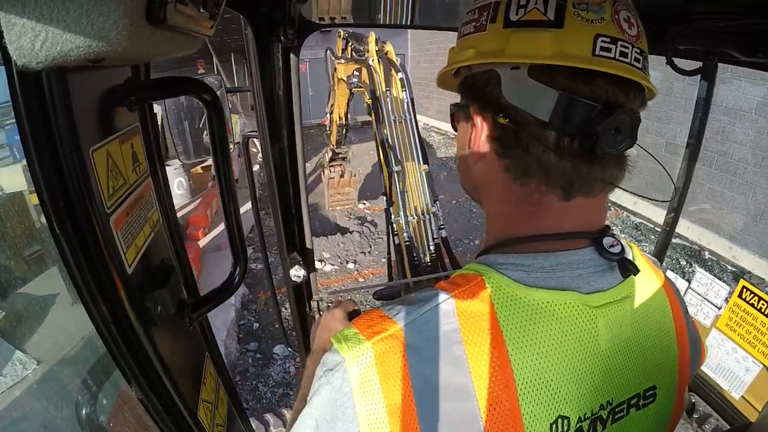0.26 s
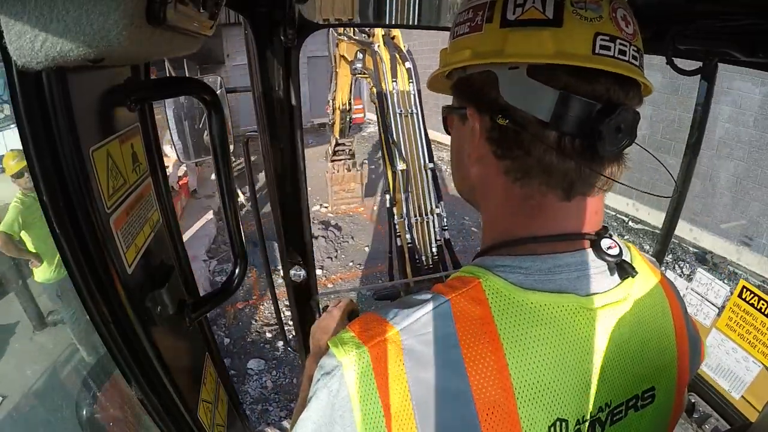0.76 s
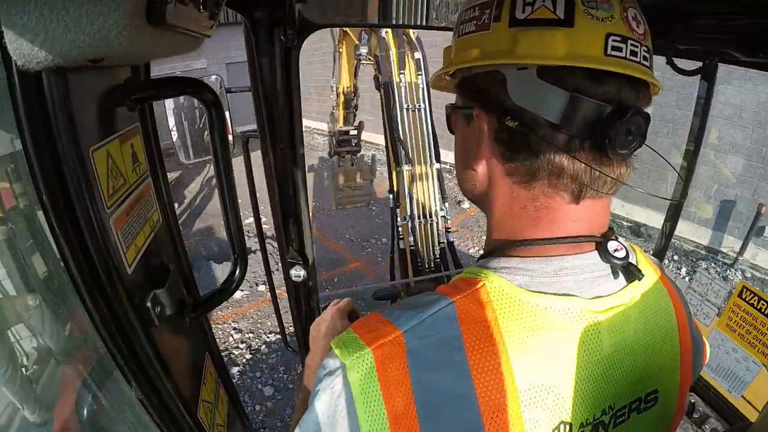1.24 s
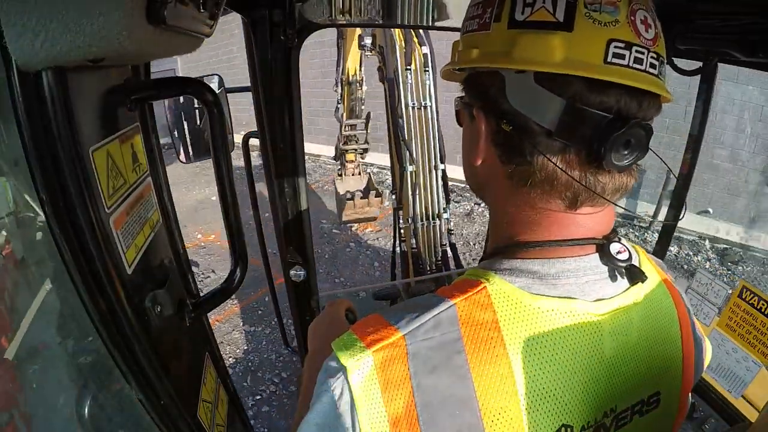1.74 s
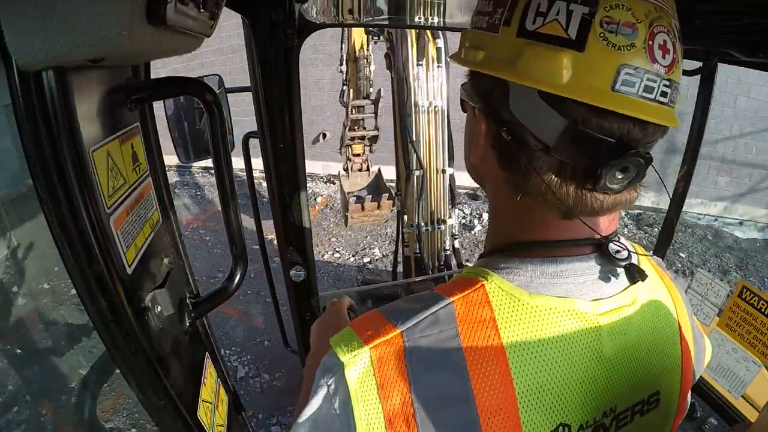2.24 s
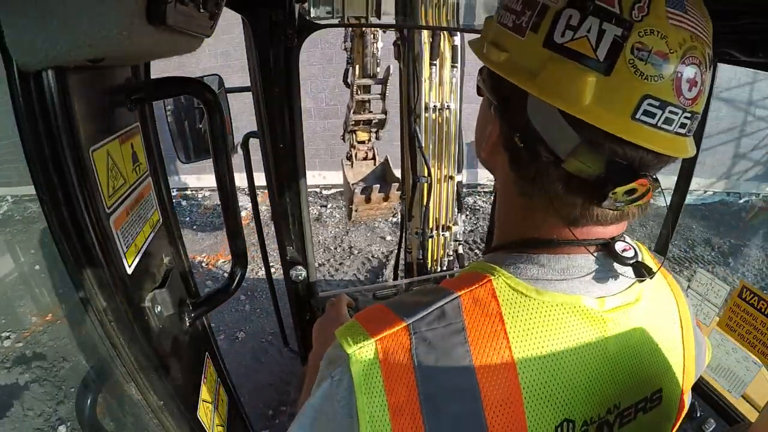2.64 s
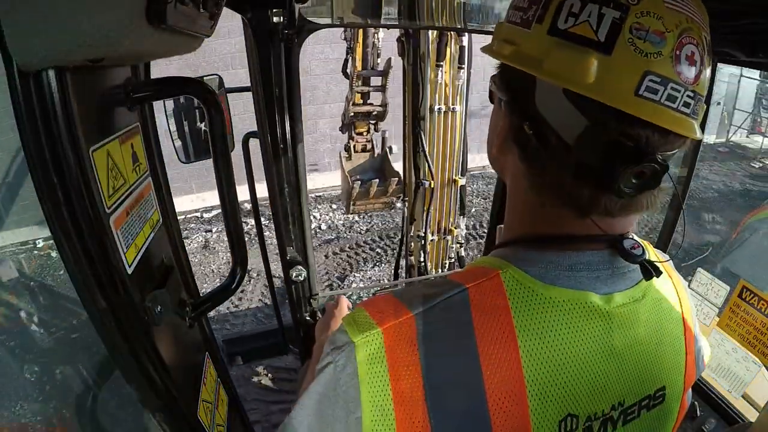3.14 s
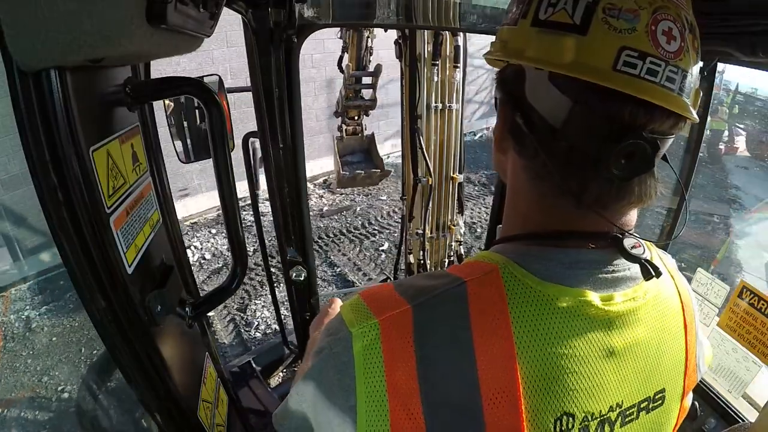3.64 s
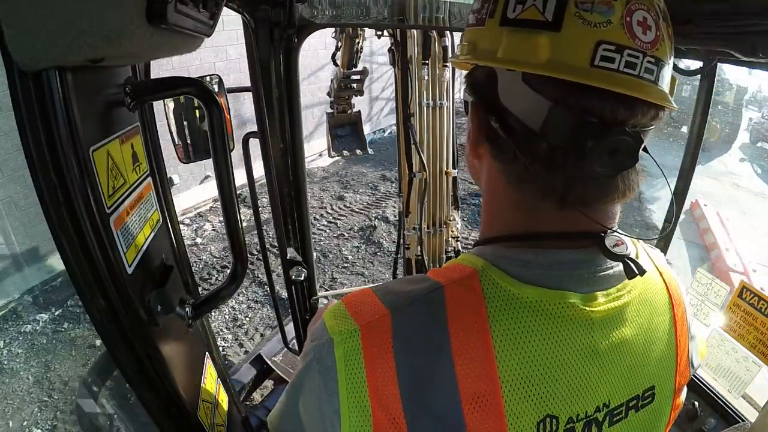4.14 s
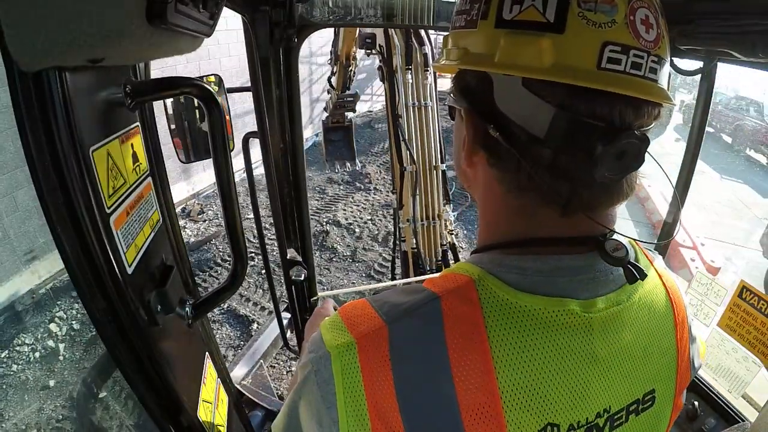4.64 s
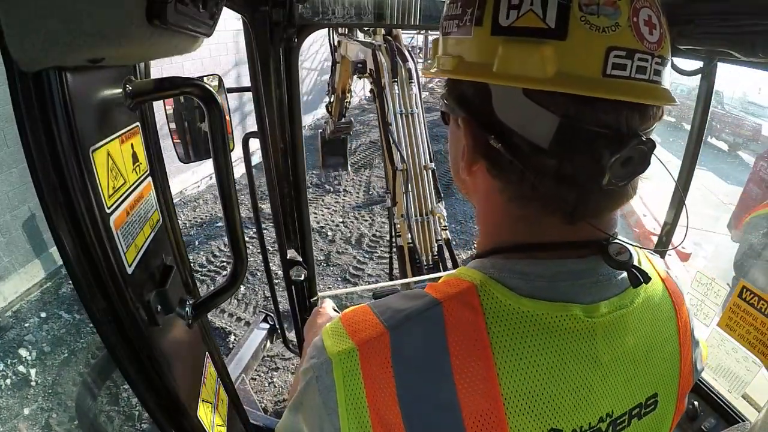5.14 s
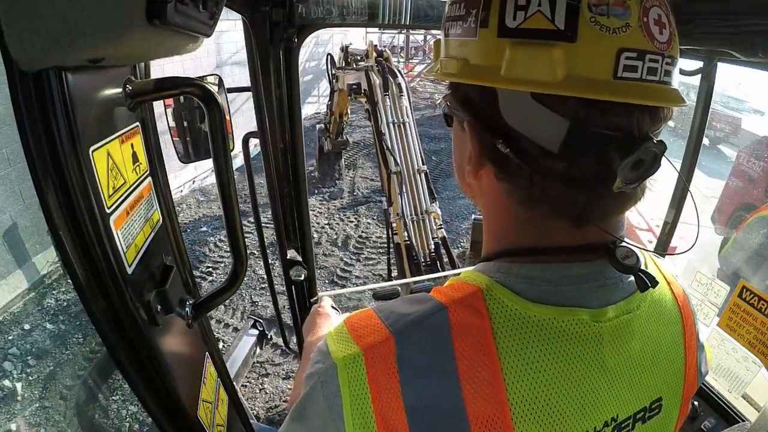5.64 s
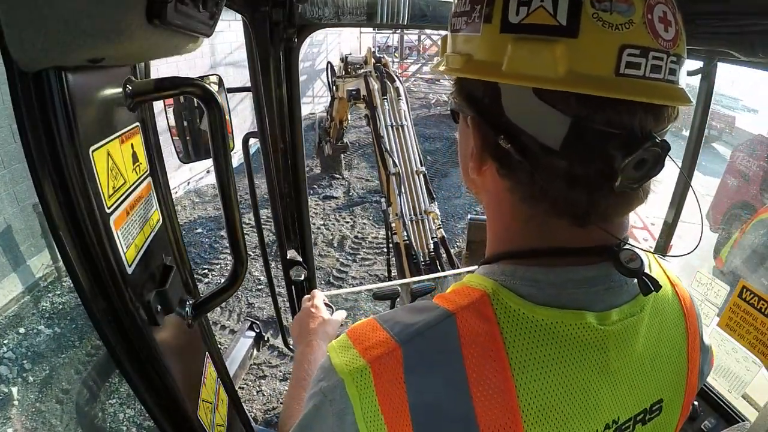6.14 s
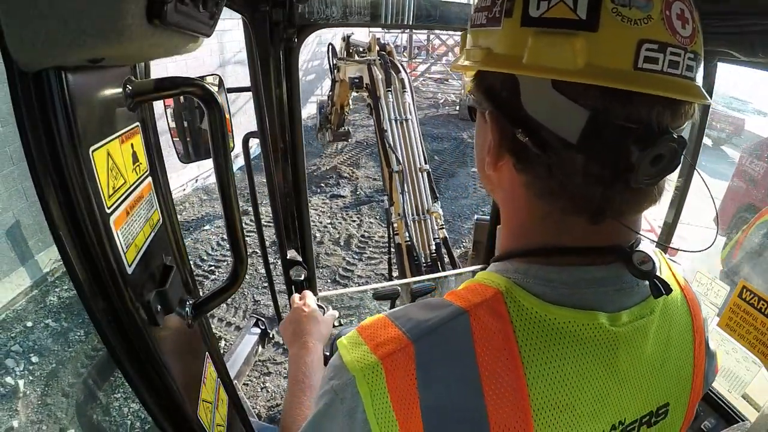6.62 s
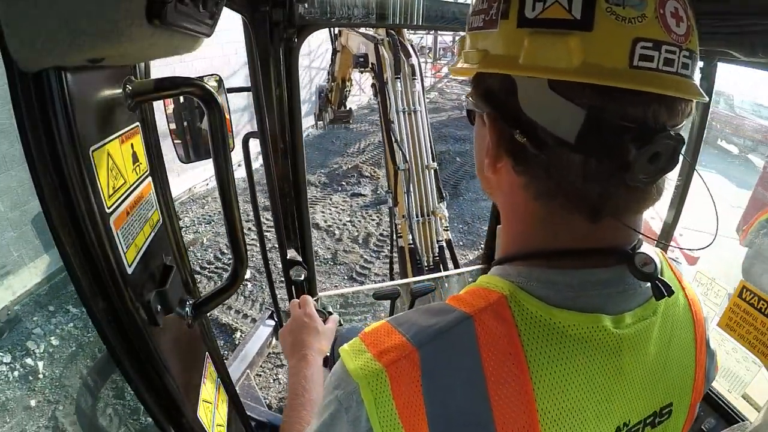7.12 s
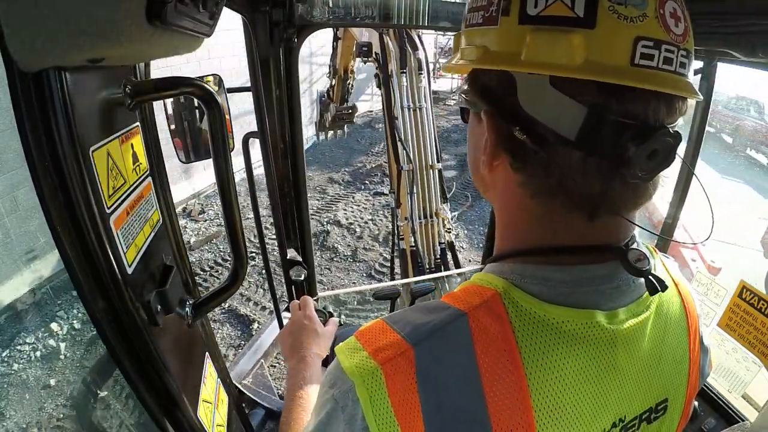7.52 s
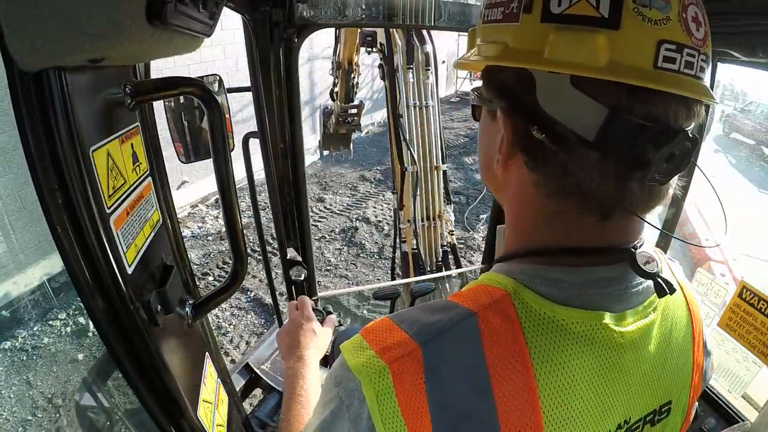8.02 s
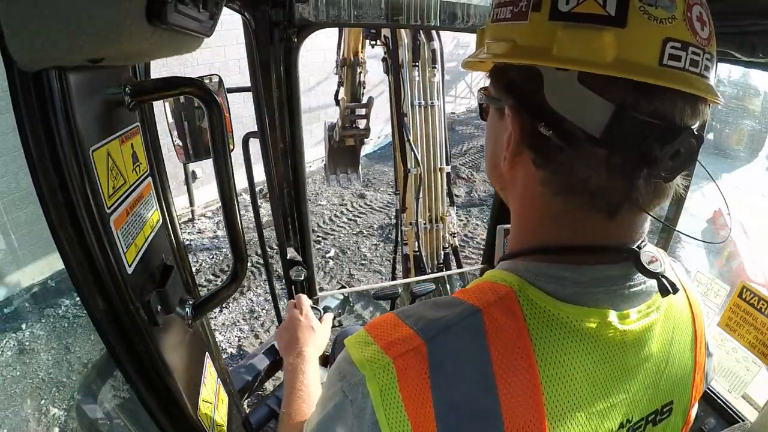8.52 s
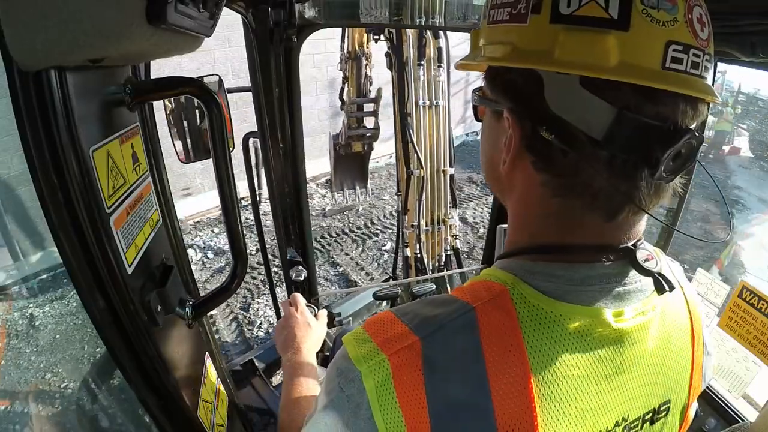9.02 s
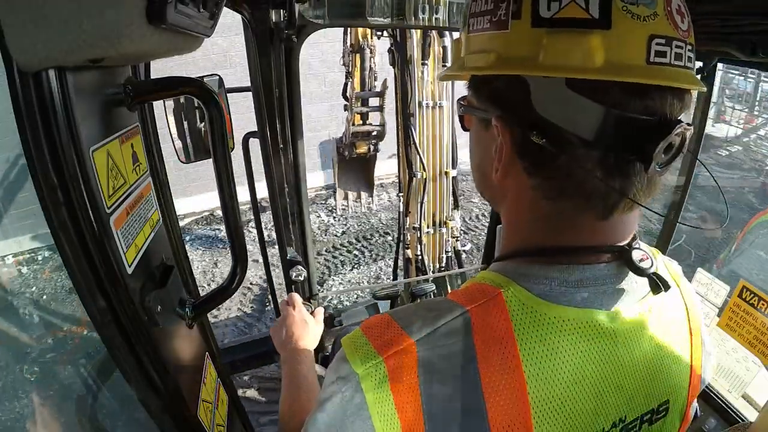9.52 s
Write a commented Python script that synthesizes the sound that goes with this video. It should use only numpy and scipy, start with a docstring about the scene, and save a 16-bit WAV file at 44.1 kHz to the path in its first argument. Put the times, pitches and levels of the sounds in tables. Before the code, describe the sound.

Close inside an excavator cab, a diesel drones at nearly constant revs with a deep, fluttering boom and blower hum. A hydraulic pump whines near 650 hertz, dipping and surging as the load changes. Low hums come and go beneath oil hiss and panel buzz. Small, muted bucket scrapes and stone ticks appear around three to four seconds, five to six, and near the end.

```python
"""Small excavator, inside the cab

A four-cylinder diesel booms at nearly steady revs under blower tones; a nine-piston pump whines as the load changes.
Engine, pump and blower are wavering sines; cab rumble, block roar and oil hiss are coloured noise.
Low hums come and go, rough tones flutter near 2.4 kHz, and the bucket scrapes and ticks in gravel
as short bursts of band-passed noise. A limiter and a steep treble cut finish the sound."""
import sys
import numpy as np
from scipy import signal
from scipy.fft import rfft, irfft, next_fast_len
from scipy.io import wavfile
from scipy.ndimage import uniform_filter1d, minimum_filter1d

SR = 44100
rng = np.random.default_rng(int(sys.argv[2]) if len(sys.argv) > 2 else 0)


def generate_wav(sig):
    """Save sig (samples, or channels by samples) to the path in sys.argv[1] as 16-bit PCM at SR."""
    pcm = np.round(np.clip(np.atleast_2d(sig).T, -1, 1) * 32767).astype(np.int16)
    wavfile.write(sys.argv[1], SR, pcm)


N = 430857  # samples

WHINE_ORDER = 36  # whine periods per four-stroke cycle: nine pistons, two crank turns, second multiple


def undb(db):
    """Decibels to gain."""
    return 10 ** (np.asarray(db) / 20)


def curves(table):
    """Columns of a time table, drawn as straight lines with one value a sample."""
    s, *columns = np.transpose(table)
    return [np.interp(np.arange(N) / SR, s, c) for c in columns]


def walk(rate):
    """A random wander: levels held 1 / rate seconds, then slewed twice; spread near 1."""
    hold = int(SR / rate)
    steps = np.repeat(rng.standard_normal(N // hold + 1), hold)
    slewed = uniform_filter1d(uniform_filter1d(steps, hold), hold)
    return 1.16 * slewed[:N]  # makes up for the spread lost in slewing


def tone(turns, db, waver_db=0., rate=3.):
    """A sine on a running count of turns, at an rms level in dB that wavers."""
    level = undb(db + waver_db * walk(rate))
    return np.sqrt(2) * level * np.sin(2 * np.pi * (turns + rng.random()))


def swell(s, span):
    """A smooth rise and fall around s, about span seconds long."""
    return np.exp(-np.abs((np.arange(N) / SR - s) / (span / 2)) ** 2.2)


def lifted(rest_db, rows):
    """Level in dB that rests low; each (centre s, length s, dB) row adds a swell of gain."""
    return 20 * np.log10(undb(rest_db) + sum(undb(db) * swell(s, span) for s, span, db in rows))


def colour(x, points):
    """Gives white x the density of (Hz, dB per Hz) points, next to nothing outside them."""
    size = next_fast_len(N)
    hz, db = np.transpose(points)
    log_hz = np.log(np.arange(size // 2 + 1) * SR / size + 1)  # + 1 avoids log of zero
    density_db = np.interp(log_hz, np.log(hz), db, -200, -200)
    return irfft(rfft(x, size) * undb(density_db), size)[:N] * np.sqrt(SR / 2)


def band(x, low_hz, high_hz):
    """Band-pass scaled to rms 1."""
    y = signal.sosfilt(signal.butter(2, [low_hz, high_hz], "band", fs=SR, output="sos"), x)
    return y / np.std(y)


def low_pass(x, hz):
    """Lower part of x with no delay; x minus this is the upper part."""
    return signal.sosfiltfilt(signal.butter(2, hz, fs=SR, output="sos"), x)


def engine(cycles, effort, fire_db, octave_db):
    """Four firings a cycle make the boom, wavered by the belt; lesser cycle lines grow with effort."""
    # Sines locked to the four-stroke cycle: multiples of the cycle rate.
    order = [2, 6, 10, 13, 14, 16, 20, 21, 23, 25, 27, 28, 30, 32, 33, 34, 38, 40, 42, 43, 44, 46, 53, 60,
             62, 63, 64, 67, 68, 69, 70, 76, 79, 80, 81, 83, 84, 86, 94, 100]
    # Level of each of those sines in dB, before effort and waver.
    order_db = [-28.5, -29, -41, -50, -45, -48.5, -41, -52.5, -46.5, -50, -44, -45.5, -48.5, -51, -46, -56,
                -48, -51.5, -51, -46.5, -50.5, -52.5, -61.5, -55, -54, -56.5, -51, -56.5, -51, -51.5, -59,
                -64, -64.5, -56.5, -50.5, -57, -55, -51.5, -51, -63.5]
    belt_ratio, belt_depth = .59, .3  # wavers per cycle, share of the boom's amplitude

    belt = 1 + belt_depth * np.sin(2 * np.pi * belt_ratio * cycles)
    boom = belt * tone(4 * cycles, fire_db, 0.26, 8) + tone(8 * cycles, octave_db, 1.6, 9.8)
    lines = 0
    for k, db in zip(order, order_db):
        waver_db = min(1.3 + 0.14 * k, 3.5)  # higher lines are less steady
        lines = lines + tone(k * cycles, db + 0.015 * k * effort, waver_db, 5)
    return boom + lines


def panel_lifts(cycles):
    """Panels briefly lift the 24th and 26th multiples of the cycle; their phase trembles."""
    # Each row: centre in seconds, length in seconds, level added to multiple 24 in dB, to multiple 26 in dB.
    lifts = np.array([(.41, .35, -36, -35), (1.72, 0.71, -42, -40), (3.13, .35, -41, -48),
                      (4.1, .7, -41, -42), (4.7, 0.48, -36, -40), (6.59, 0.36, -35, -37),
                      (7.3, 0.58, -34.5, -36), (8.103, .8, -48, -38), (8.87, 0.64, -39, -50),
                      (9.77, 0.35, -44, -42)])
    out = 0
    for k, column in ((24, 2), (26, 3)):
        level_db = lifted(-58.5, lifts[:, [0, 1, column]])
        out = out + tone(k * cycles + .05 * walk(15), level_db, 3.0, 10)
    return out


def blower(blade_db):
    """Electric blower: sines on multiples of a shaft rate that drifts slightly, free of the engine."""
    # Each row: multiple of the blower turn, level in dB against the blade level.
    parts = [(1, -10.5), (4, -6), (5, 1.5), (7, -8)]
    turns = np.cumsum(39.07 + 0.0478 * walk(2.965)) / SR  # Hz, with its drift
    return sum(tone(k * turns, blade_db + db, 2.25, 6) for k, db in parts)


def pump(cycles, effort):
    """Nine piston strokes a shaft turn, trembling in timing; the second multiple is the main whine."""
    # The whine at twice the piston rate, as the levers load the pump. Each row: time in seconds, level in dB.
    whine = [(0, -29.5), (.08, -38.5), (.25, -27.5), (.58, -34), (1.08, -33.5), (1.5, -28), (1.88, -28),
             (2.16, -35.5), (2.35, -25.5), (2.7, -23), (3.1, -26.5), (3.24, -25), (3.29, -38.5),
             (3.53, -35.5), (3.64, -26.5), (3.79, -30.5), (3.93, -24), (4.52, -25), (5.7, -29.5),
             (5.91, -23), (6.09, -44.5), (6.3, -39), (6.55, -29), (6.83, -25), (6.96, -32.5), (7.12, -27),
             (7.25, -34), (7.55, -28), (8.35, -28.5), (8.8, -25.5), (9.48, -27.5), (9.64, -33.5),
             (9.77, -26.5)]
    # The piston rate surges when a valve shifts. Each row: centre in seconds, length in seconds, added level in dB.
    surges = [(.25, .6, -33.5), (.79, 0.19, -27), (.97, 0.086, -32), (1.81, 0.64, -32.5),
              (2.357, 0.14, -32.5), (2.9, 0.55, -29.5), (3.272, 0.18, -25), (3.58, 0.33, -22.5),
              (3.82, 0.094, -27.5), (4.49, 0.31, -37.5), (4.973, .1, -30), (7.21, 0.14, -32.5),
              (7.78, 0.15, -29.5), (9.55, 0.47, -34)]
    # Spells in which the ninth multiple sings. Each row: centre in seconds, length in seconds, added level in dB.
    ninth = [(0.417, .45, -50), (3.0, .9, -55.5), (4.854, .7, -56), (5.6, .7, -51), (6.6, 0.33, -54),
             (8.3, 0.98, -54), (9.1, .6, -54)]

    strokes = WHINE_ORDER / 2 * cycles + 0.0065 * walk(40)
    whine_db, = curves(whine)
    # The fourth multiple follows effort and, less than fully, the whine.
    fourth_db = -46.5 + 2.5 * effort + 0.41 * (whine_db - whine_db.mean())
    return (tone(strokes, lifted(-42, surges), 1.8, 14)
            + tone(2 * strokes, whine_db, 0.97, 14)
            + tone(4 * strokes, fourth_db, 2, 4)
            + tone(9 * strokes, lifted(-69.5, ninth), 3.5, 12))


def clatter(cycles, repeat, gate):
    """White drive: part repeats every cycle (valve train), all of it swells at each firing."""
    pattern = rng.standard_normal(int(SR / 18))  # roughly one cycle long
    again = pattern[(cycles % 1 * len(pattern)).astype(int)]
    angle = 2 * np.pi * cycles
    # Slower terms make the firings uneven.
    pulse = np.cos(4 * angle) + 0.76 * np.cos(2 * angle + 0.65) + 0.65 * np.cos(angle)
    fresh = rng.standard_normal(N)
    return (1 + gate * pulse) * (repeat * again + np.sqrt(1 - repeat ** 2) * fresh)


def rumble(cycles):
    """Cab rumble: low coloured clatter whose deep and upper parts wander apart in level."""
    # Colour of the rumble. Each row: frequency in Hz, density in dB per Hz before the level moves.
    spectrum = [(2, -60.5), (24, -50.5), (38, -41.5), (47, -54.5), (56, -36), (85, -39), (125, -36),
                (150, -47), (205, -49.5), (235, -47), (300, -58), (350, -53.5), (450, -58.5), (950, -65)]
    # Rumble above the boom; only moves about the mean count. Each row: time in seconds, level in dB.
    cab = [(0, -29.5), (2.0, -29.5), (2.7, -29), (3.5, -27), (4.0, -28), (5.2, -29), (6.1, -32.5),
           (6.55, -29), (7.3, -29), (9.0, -30.5), (9.77, -29)]

    cab_db, = curves(cab)
    low = colour(clatter(cycles, repeat=0.15, gate=0.11), spectrum)
    deep = low_pass(low, 130)
    upper_db = cab_db - cab_db.mean() + .6 * walk(4.5)
    return deep * undb(2.8 * walk(4)) + (low - deep) * undb(upper_db)


def roar_and_oil(cycles, effort):
    """Block roar below, oil hissing through the valves above: one colour, split into moving bands."""
    # Colour of roar and oil. Each row: frequency in Hz, density in dB per Hz before the level moves.
    spectrum = [(950, -63.5), (1600, -66.5), (2000, -67.5), (2200, -73), (2500, -69.5), (2980, -74),
                (3100, -77), (3400, -74), (4000, -74), (6200, -82.5), (7000, -92.5), (10000, -98),
                (11500, -104), (15000, -112)]
    # Upper oil hiss; only moves about the mean count. Each row: time in seconds, level in dB.
    jet = [(0.05, -50.5), (2.26, -47), (2.34, -50.5), (3.17, -46), (3.6, -46.5), (3.93, -44.5), (4.17, -47),
           (5.68, -45.5), (5.84, -43.5), (6.0, -46.5), (9.31, -49), (9.45, -46.5), (9.58, -51), (9.72, -50)]

    jet_db, = curves(jet)
    jet_db = jet_db - jet_db.mean()
    block = low_pass(colour(clatter(cycles, repeat=0.44, gate=0.11), spectrum), 2240)
    oil = colour(clatter(cycles, repeat=0.22, gate=0.035), spectrum)
    below_jet = low_pass(oil, 4800)
    flow = below_jet - low_pass(below_jet, 1840)
    return (block * undb(0.1 * effort + .5 * walk(5.2))
            + flow * undb(0.24 * jet_db + 0.55 * walk(12))  # follows the jet only partly
            + (oil - below_jet) * undb(jet_db + .3 * walk(18)))


def panel_rings():
    """Cab panels ring with the roar: narrow bands of noise that waver in level."""
    # Each row: centre in Hz, width in Hz, level in dB.
    rings = [(1128, 28, -52.5), (1219, 73, -55.5), (1480, 90, -49.5), (2410, 240, -53.5), (2630, 120, -56)]
    return sum(undb(db + 2.0 * walk(13)) * band(rng.standard_normal(N), hz - w / 2, hz + w / 2)
               for hz, w, db in rings)


def narrow_hisses():
    """Two narrow bands of noise that rest low and swell in spells."""
    # Spells of the lower hiss. Each row: centre in seconds, length in seconds, added level in dB.
    lower = [(1.4, 2.9, -68.5), (7.9, 3.1, -69)]
    # Spells of the upper, thinner hiss. Each row: centre in seconds, length in seconds, added level in dB.
    upper = [(5.85, 1.0, -73)]
    hiss = undb(lifted(-74.5, lower) + 1.1 * walk(6)) * band(rng.standard_normal(N), 9250, 9850)
    thin = undb(lifted(-82, upper) + 1.1 * walk(6)) * band(rng.standard_normal(N), 12700, 13400)
    return hiss + thin


def rasps():
    """Three rough tones near 2.4 kHz: fast pitch wander roughens them and their levels flutter."""
    out = 0
    for hz in (2370, 2440, 2500):
        pitch_hz = hz + 40 * walk(3) + 35 * walk(60)
        out = out + tone(np.cumsum(pitch_hz) / SR, -58, 4.5, 12)
    return out


def hums():
    """Low tones that come and go under the floor plate; their pitch wanders."""
    # Each row: centre in seconds, length in seconds, level in dB, mean pitch in Hz.
    spells = [(1.155, .5, -18, 113.5), (2.25, 2.2, -22.5, 117), (3.5, 1.4, -21, 93.7),
              (4.603, 1.4, -21, 92.7), (6.494, 2.6, -20, 94.35), (8.996, 3.7, -22, 94.3),
              (5.203, 2.7, -30, 116.2), (8.695, .8, -28, 118), (9.124, 0.27, -17.5, 130),
              (9.6, 0.52, -23, 110), (9.76, 0.26, -19.5, 187.6)]
    out = 0
    for s, span, db, hz in spells:
        turns = np.cumsum(hz + 2.495 * walk(12)) / SR
        out = out + swell(s, span) * tone(turns, db, 3.4)
    return out


def bucket():
    """Bucket in gravel: scrapes of uneven grit noise, each in its own band, and short bright ticks."""
    # Scrapes. Each row: start in seconds, length in seconds, level in dB, centre in Hz.
    scrapes = [(2.65, .03, -58, 8500), (2.66, .04, -46, 5000), (2.72, .03, -59, 8800),
               (3.096, .025, -52, 7000), (3.302, 0.11, -49, 4590), (3.715, .04, -64, 9000),
               (3.9, 0.074, -40, 4800), (4.11, .03, -62, 10800), (5.4, 0.031, -42, 4500),
               (5.405, .02, -54, 8500), (5.52, .03, -55, 7500), (5.79, 0.11, -47, 5660),
               (6.617, .05, -58, 7500), (9.41, .045, -45, 5300), (9.49, .025, -56, 7500)]
    # Stones ticking on steel. Each row: start in seconds, level in dB before a 5 dB cut.
    ticks = [(3.1094, -46), (5.3754, -39), (5.4026, -44), (5.5817, -49), (6.1709, -45), (9.3616, -41),
             (9.4154, -48)]

    t = np.arange(N) / SR
    grit = rng.standard_normal(N) * undb(3.5 * walk(400))
    scrape, fade = 0, 0
    for s, span, db, hz in scrapes:
        hump = np.exp(-((t - s - span / 2) / (span / 2)) ** 2)
        scrape = scrape + undb(db) * hump * band(grit, 0.86 * hz, 1.17 * hz)
    for s, db in ticks:
        fade = fade + undb(db) * np.exp(-np.maximum(t - s, 0) / .0022) * (t >= s)  # 2.2 ms decay
    return scrape + undb(-5) * fade * band(rng.standard_normal(N), 7000, 15000)


def scene():
    """Engine, pump and clatter share one count of four-stroke cycles; effort is how far the revs sag."""
    # Revs, heard as the pump whine. Each row: time in seconds, whine pitch in Hz.
    speed = [(0.0, 656.2), (0.22, 656.4), (0.55, 650), (1.98, 649.6), (2.76, 655.5), (3.11, 652.9),
             (3.3, 657), (3.66, 653.9), (4.5, 654.9), (4.7, 651), (5.73, 650.2), (6.0, 658), (6.39, 654.9),
             (6.54, 652.0), (6.94, 655.7), (7.16, 649.2), (8.4, 649.4), (8.66, 652.7), (9.05, 651.2),
             (9.5, 654.4), (9.77, 651.1)]
    # Boom and blower. Each row: time in seconds, firing level in dB, its octave in dB, blower blades in dB.
    firing = [(0.0, -11.5, -20.5, -28), (1.03, -16, -23.5, -31), (2.02, -14.5, -18.5, -30),
              (3.5, -15, -25, -33.5), (4.25, -13.5, -23, -30.5), (5.48, -13.5, -20, -29),
              (6.11, -13.5, -26, -32.5), (7.36, -14, -18.5, -27), (8.58, -13, -18, -28),
              (9.77, -15.5, -22, -27)]

    whine_hz, = curves(speed)
    cycles = np.cumsum(whine_hz / WHINE_ORDER) / SR
    effort = (whine_hz.mean() - whine_hz) / whine_hz.std()  # in standard deviations
    fire_db, octave_db, blade_db = curves(firing)
    machine = engine(cycles, effort, fire_db, octave_db) + panel_lifts(cycles) + blower(blade_db)
    machine = machine + pump(cycles, effort)
    noise = rumble(cycles) + roar_and_oil(cycles, effort) + panel_rings() + narrow_hisses()
    return (machine + noise + rasps() + hums() + bucket())[None]


def record(dry, top=0.66, ratio=6.4, hold_s=0.013):
    """A limiter ducks smoothly around peaks above top, then a steep filter cuts the treble."""
    duck = np.minimum(top / (np.abs(dry[0]) + 1e-9), 1) ** (1 - 1 / ratio)
    span = int(hold_s * SR)
    held = dry * uniform_filter1d(minimum_filter1d(duck, span), span)
    return signal.sosfilt(signal.ellip(8, .2, 70, 15200, fs=SR, output="sos"), held)  # cut above 15.2 kHz


dry = scene()
out = record(dry)
generate_wav(out)
```